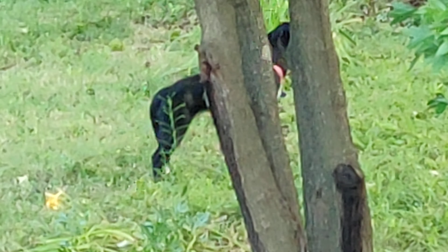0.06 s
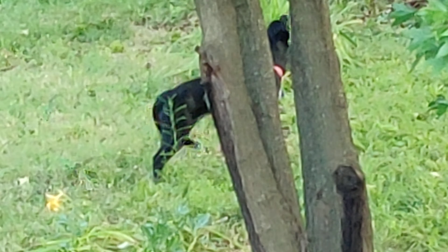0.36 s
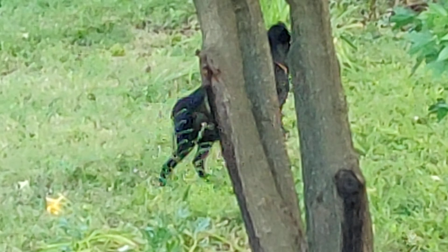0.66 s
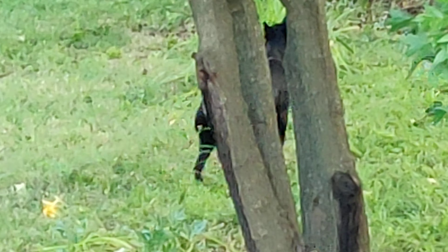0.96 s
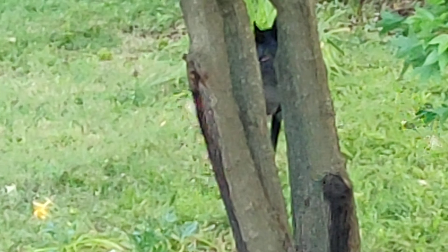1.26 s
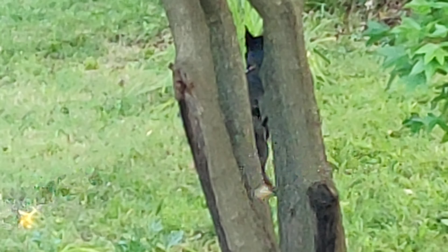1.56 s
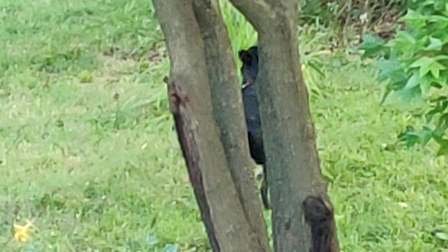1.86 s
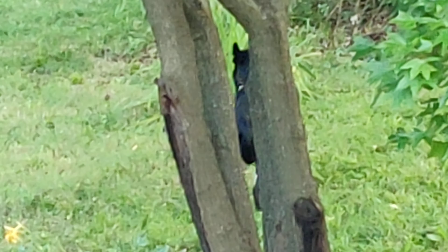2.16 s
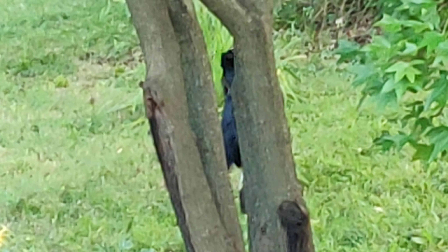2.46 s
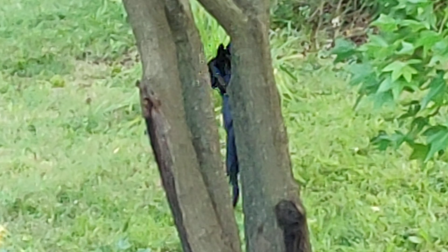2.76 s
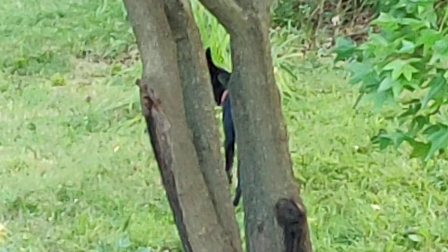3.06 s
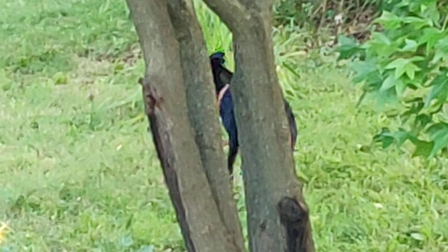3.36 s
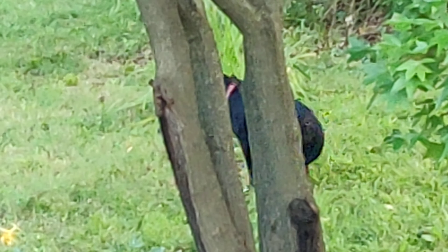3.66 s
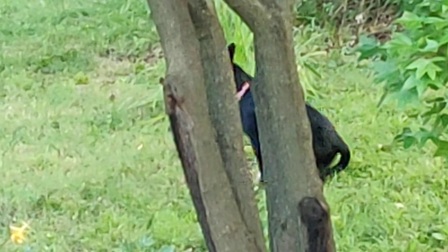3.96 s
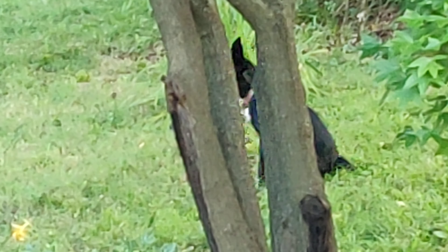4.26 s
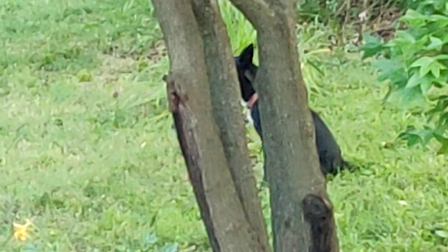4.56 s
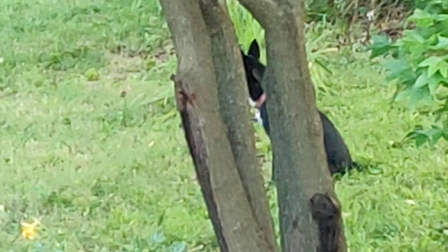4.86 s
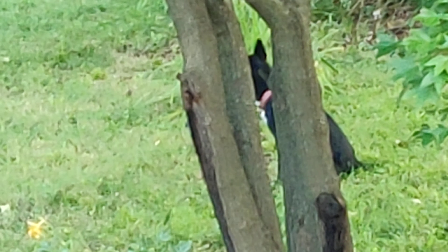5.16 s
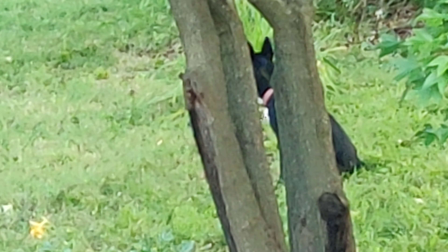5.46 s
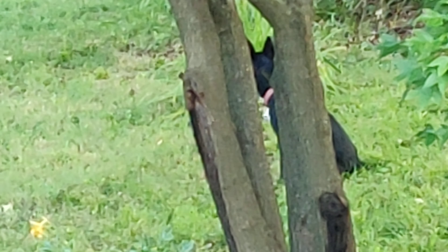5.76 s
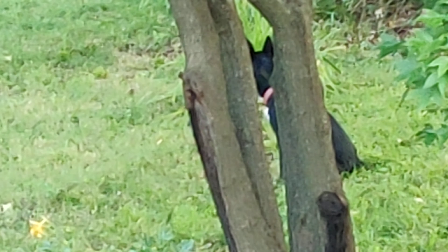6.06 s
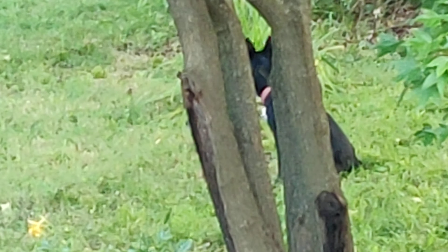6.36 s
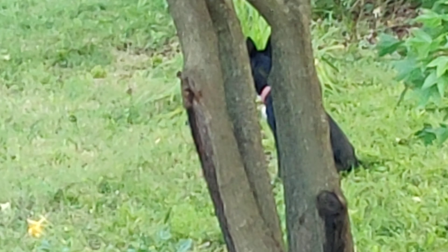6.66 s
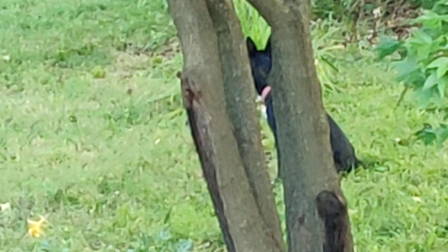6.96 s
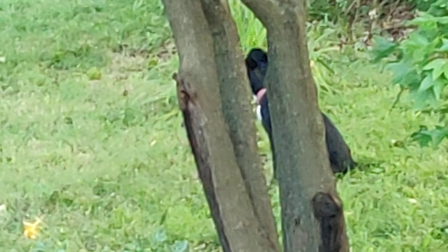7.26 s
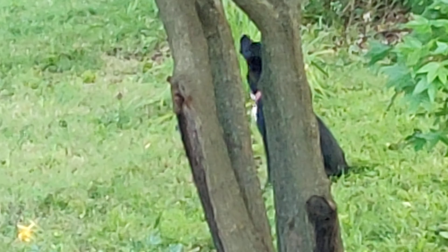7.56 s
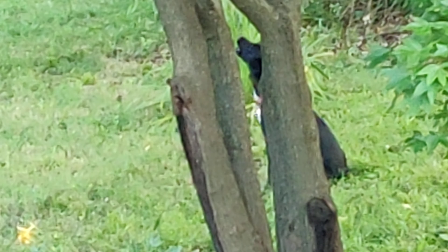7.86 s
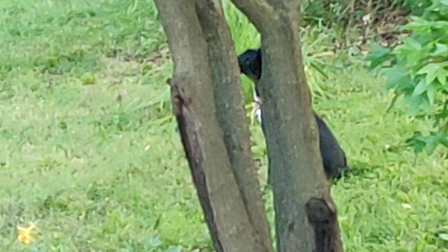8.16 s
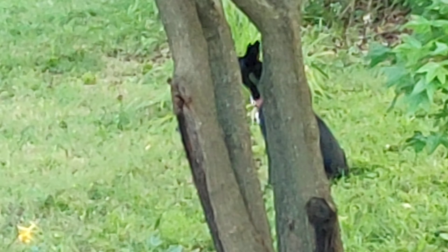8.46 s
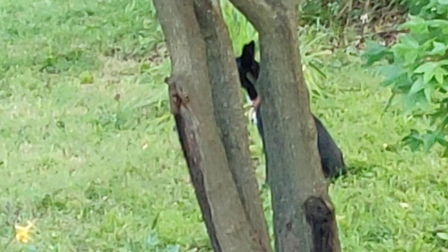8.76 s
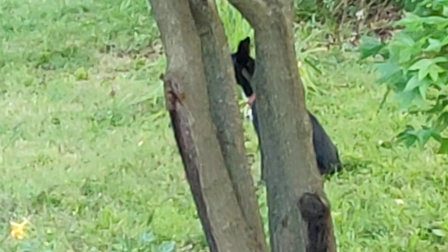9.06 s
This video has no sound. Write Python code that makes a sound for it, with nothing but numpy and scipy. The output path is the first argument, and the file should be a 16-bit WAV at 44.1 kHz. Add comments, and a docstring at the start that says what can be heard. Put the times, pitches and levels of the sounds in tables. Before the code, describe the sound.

A dog barks and howls in a yard, trailing into whimpers, while insects buzz steadily and a distant truck drones.

```python
"""A dog in a summer yard barks, strains up into a pure howl and ends in whimpers; fences and trees
send its voice back. All along, crickets trill in the grass and a far truck drones in the open air.
A katydid scrapes its wings, first in ticks, then in a buzz. The dog barks four times, rough pulses
from its throat shaped by its jaw, and gives a muffled woof. The truck shifts gear and labours on, a
low rumble swells, and a last bark breaks into a second howl and a whimper."""
import sys
import numpy as np
from scipy import signal
from scipy.fft import rfft, irfft, next_fast_len
from scipy.io import wavfile
from scipy.ndimage import uniform_filter1d

SR = 44100
rng = np.random.default_rng(int(sys.argv[2]) if len(sys.argv) > 2 else 0)


def pcm_store(signal):
    """Save signal as 16-bit PCM."""
    levels = np.round(np.clip(np.atleast_2d(signal), -1, 1) * 32767)
    wavfile.write(sys.argv[1], SR, levels.astype(np.int16).T)


N = 401751
TIME = np.arange(N) / SR


def from_db(db):
    """Turn decibels into a gain to multiply by."""
    return np.exp(np.asarray(db) * (np.log(10) / 20))


def rms_one(x):
    """Scale a signal so that its average (rms) level is 1."""
    return x / np.sqrt(np.mean(x ** 2) + 1e-20)


def evened(x, size=900):
    """Hold the level at 1, averaged over `size` samples."""
    return x / np.sqrt(np.abs(uniform_filter1d(x * x, size)) + 1e-12)


def in_time(rows):
    """Glide from row to row: each column's value at every sample."""
    times, *columns = np.transpose(rows)
    return [np.interp(TIME, times, column) for column in columns]


def latest(rows):
    """At every sample: the time since the latest event began, then that event's other columns."""
    starts, *columns = np.transpose(rows)
    which = np.maximum(np.searchsorted(starts, TIME, "right") - 1, 0)
    return [np.maximum(TIME - starts[which], 0)] + [column[which] for column in columns]


def envelope(t, length, attack_s, release_s):
    """Fade in, hold, fade out."""
    return np.clip(np.minimum(t / attack_s, (length - t) / release_s), 0, 1)


def bell(t, width):
    """A bump of height 1 around t = 0."""
    return np.exp(-.5 * np.minimum((t / width) ** 2, 100))


def swells(rows, rise_s, fall_s):
    """A bell-shaped swell for each row of peak time and level in dB."""
    out = np.zeros(N)
    for peak_s, db in rows:
        near = slice(max(int((peak_s - 4 * rise_s) * SR), 0), int((peak_s + 4 * fall_s) * SR))
        t = TIME[near] - peak_s
        out[near] += from_db(db) * np.exp(-.5 * (t / np.where(t < 0, rise_s, fall_s)) ** 2)
    return out


def drift(rate):
    """A smooth random wander of about 1, with `rate` new values a second."""
    knots = rng.standard_normal(int(N / SR * rate) + 4)
    smooth = signal.resample_poly(knots, 8, 1)
    return rms_one(np.interp(TIME * rate * 8, np.arange(len(smooth)), smooth))


def phase_of(hz):
    """The running angle, in radians, of a tone with this pitch."""
    return 2 * np.pi * np.cumsum(hz) / SR


def colour(x, gain_at):
    """Filter by a gain that depends on frequency."""
    size = next_fast_len(N + 8192)
    hz = np.arange(size // 2 + 1) * SR / size + 1e-3
    return irfft(rfft(x, size) * gain_at(hz), size)[..., :N]


def at_hz(points, hz):
    """Read between the points of a curve, on a log-frequency axis."""
    point_hz, values = np.transpose(points)
    return np.interp(np.log(hz), np.log(point_hz), values)


def shaped(x, spectrum):
    """Filter by rows of frequency in Hz and gain in dB."""
    return colour(x, lambda hz: from_db(at_hz(spectrum, hz)))


def moving_resonance(x, centre_hz, width_hz, size=160):
    """A ringing filter whose centre moves every `size` samples."""
    radius, state, out = np.exp(-np.pi * width_hz / SR), np.zeros(2), np.zeros(N)
    feed = np.array([1, 0, -1]) * (1 - radius ** 2) / 2
    for i in range(0, N, size):
        feedback = [1, -2 * radius * np.cos(2 * np.pi * centre_hz[i] / SR), radius ** 2]
        out[i:i + size], state = signal.lfilter(feed, feedback, x[i:i + size], zi=state)
    return out


def later(x, delay_s):
    """The same sound a little later."""
    return np.interp(TIME - delay_s, TIME, x, left=0)


def pan(db):
    """Two gains that make the left side `db` louder than the right."""
    return from_db(np.array([[db], [-db]]) / 2)


def stereo_noise(likeness):
    """White noise whose two sides are alike, by rows of frequency in Hz and likeness from 0 to 1."""
    mid, side = rng.standard_normal((2, N))
    common = colour(mid, lambda hz: np.sqrt(1 + at_hz(likeness, hz)))
    apart = colour(side, lambda hz: np.sqrt(1 - at_hz(likeness, hz)))
    return np.array([common + apart, common - apart])


def vocal_folds(pitch_hz, rough, jitter=.07, doubling=.47, unsteady=.02):
    """Pulses from the throat, whose timing and strength turn chaotic as the voice gets rough."""
    rough = np.clip(rough, 0, 1)
    phase = phase_of(pitch_hz * (1 + rough * (jitter * drift(350) + unsteady * drift(70))))
    pulses = sum(np.cos(k * phase) / (1 + (k / 6) ** 2) for k in range(1, 10))
    # every other pulse weakens, which adds tones between the harmonics
    pulses *= 1 + rough * (doubling * np.cos(phase / 2) + 1.1 * drift(260))
    # air rushes out at each opening and takes over only in the harshest moments
    air = rng.standard_normal(N) * (1 + .6 * np.cos(phase))
    return (1 - .55 * rough) * pulses + 3.8 * rough ** 1.25 * air


# The barks. A "moment" runs from 0 at a bark's start to 1 at its end. Each row: start in seconds,
# length in seconds, level in dB, first pitch in Hz, top pitch in Hz, moment of the top pitch,
# roughness from 0 to 1, harshest moment, the mouth's resonance in Hz when open and when closed,
# rasp in dB, raspiest moment.
BARKS = [(0.0, 0.2, -19, 445.1, 489.5, .42, 0.33, 0.665, 878, 660, -21.5, 0.29),
         (1.84, 0.17, -19, 396, 461.9, 0.66, .38, .36, 735, 620, -26, 0.74),
         (2.563, 0.18, -19.5, 424.2, 485.6, .5, .5, .72, 842, 530, -23.5, 0.67),
         (3.293, .196, -16.5, 365, 490.5, .74, .6, .44, 846, 610, -18.5, .14),
         (3.828, 0.17, -19.5, 435, 470, .42, .58, .13, 740, 490, -21, 0.21),
         (7.236, 0.18, -19, 465, 533, .75, 0.5, .45, 915, 650, -24, .55)]


def bark_gesture(loudest_at=.42, arch_db=7.5, widest_at=.3, sag_hz_per_s=550, rasp_fade_db_per_s=95):
    """In each bark the level arches, the pitch climbs and sags, and the jaw opens and shuts."""
    (t, length, db, first_hz, top_hz, top_at, rough, harsh_at,
     open_hz, closed_hz, rasp_db, rasp_at) = latest(BARKS)
    t = np.minimum(t, length)
    moment, past_top_s = t / length, t - top_at * length
    gain = envelope(t, length, attack_s=.02, release_s=.038)
    gain *= from_db(db - arch_db * (2 * (moment - loudest_at)) ** 2)
    climb_hz = (top_hz - first_hz) * np.minimum(moment / top_at, 1) ** 2
    pitch_hz = first_hz + climb_hz - sag_hz_per_s * np.maximum(past_top_s, 0)
    # the voice clears at its top pitch, and has one brief spell of chaos
    rough = rough * (1 - .39 * bell(past_top_s, .016)) + .5 * bell(t - harsh_at * length, .017)
    mouth_hz = open_hz + (closed_hz - open_hz) * ((moment - widest_at) / (1 - widest_at)) ** 2
    return gain, pitch_hz, rough, mouth_hz, rasp_db - rasp_fade_db_per_s * abs(t - rasp_at * length)


# How the throat colours the voice. Each row: frequency in Hz, gain in dB.
THROAT = [(200, -39.5), (310, -8.5), (400, 1), (500, 1.5), (600, 0.5), (800, 0.5), (950, -2), (1100, -5),
          (1330, -2), (1580, -13.5), (2500, -32.5), (3100, -34), (3550, -32), (9000, -48)]


def barks(leak=.13, second_db=-4.5, bite_hz=2500):
    """The mouth's resonance moves with the jaw, and effort brings out a rasp in the upper throat."""
    gain, pitch_hz, rough, mouth_hz, rasp_db = strained(bark_gesture())
    voice = shaped(vocal_folds(pitch_hz, rough), THROAT)
    body = colour(voice, lambda hz: 1 / (1 + (hz / 1550) ** 12))
    mouth = moving_resonance(body, mouth_hz, width_hz=506) + leak * body
    # the next resonance rides above the first and grows as the jaw opens
    second = moving_resonance(body, 1.552 * mouth_hz, width_hz=290)
    mouth -= from_db(second_db) * (mouth_hz / 800) ** 2 * second
    rasp = from_db(rasp_db - .5) * evened(voice - body)
    # a narrow throat resonance grows twice as fast as the rasp
    bite = from_db(11 + 2 * rasp_db) * evened(colour(voice, lambda hz: bell(hz - bite_hz, 230)))
    return gain * (evened(mouth, size=400) + rasp + bite)


# Echoes from fences and trees. Each row: delay in seconds, level in dB, left over right in dB.
ECHOES = [(.031, -12, 6.5), (.083, -29.5, -2), (.145, -26.5, 3)]


def yard(sound, sideways, scatter_s=.069, scatter_db=-9, tail_s=1.0, tail_db=-11):
    """Trunks dull the direct sound; what spreads sideways returns as scatter, echoes and a thin tail."""
    t = TIME[:SR]
    scatter = rng.standard_normal((2, SR)) * from_db(-60 * t / scatter_s)
    tail = rng.standard_normal((2, SR)) * from_db(-60 * t / tail_s) * np.clip(t / .048, 0, 1)
    response = (from_db(scatter_db) * rms_one(scatter) + from_db(tail_db) * rms_one(tail)) / np.sqrt(SR)
    # the ground makes some pitches come back stronger than others
    ground = [(300, -8), (460, 3.5), (700, -4), (950, -4), (1400, 6.5), (2500, 7), (3500, 15.5),
              (8000, 2)]
    reverb = shaped(signal.fftconvolve(sideways[None], response, axes=1)[:, :N], ground)
    echoes = sum(from_db(db) * pan(side_db) * later(sideways, delay) for delay, db, side_db in ECHOES)
    direct = pan(1.8) * shaped(sound, [(2400, 0), (3300, -7), (9000, -7)])
    return direct + reverb + echoes


# The colour of the far insect chorus. Each row: frequency in Hz, gain in dB.
CHORUS = [(4000, -35), (4750, -22.5), (5100, -2), (5800, -2), (6400, -2), (6950, 1), (7400, -17),
          (8200, -18.5), (11000, -17.5), (13000, -12.5), (15300, 0), (16000, -8.5)]


def insect_chorus(level_db=-47, swell_db=2, swell_at_s=5.9):
    """Many far insects blend into a high hiss that swells once."""
    gain = from_db(level_db + swell_db * bell(TIME - swell_at_s, .5))
    return pan(-.5) * gain * rms_one(shaped(rng.standard_normal((2, N)), CHORUS))


def wing_tone(hz, width_hz):
    """The ring of an insect's wing, blurred on its way through the grass."""
    noise = rng.standard_normal((2, N))
    return rms_one(colour(noise, lambda f: 1 / (1 + (2 * (f - hz) / width_hz) ** 4)))


# The near crickets. Each row: pitch in Hz, width of the tone in Hz, pulses per second, level in dB,
# left over right in dB.
CRICKETS = [(5760, 520, 70, -55, -2.5), (5576, 650, 150, -61.5, -6), (6300, 600, 120, -62, -10),
            (6810, 400, 35, -66, -19.5)]


def crickets():
    """Each cricket's wings ring in fast pulses, making a steady trill."""
    out = np.zeros((2, N))
    for hz, width_hz, pulses_hz, db, side_db in CRICKETS:
        trill = rms_one(1 + .94 * np.sin(phase_of(pulses_hz * (1 + .013 * drift(3.3)))))
        out += from_db(db) * pan(side_db) * trill * wing_tone(hz, width_hz)
    return out


# A far truck pulls up through a gear, then shifts and labours on; a fainter, higher hum goes with it.
# Each row: time in seconds, pitch in Hz (for the engine, its firing rate), relative level in dB.
ENGINE_PULLS = [(0.2, 124.4, -53), (1.79, 138.3, -48.5), (5.24, 164.9, -52), (5.75, 155, -57.5)]
ENGINE_LABOURS = [(5.9, 123.8, -53), (6.04, 125.8, -39), (6.65, 126.4, -38.5), (6.69, 127.2, -48),
                  (7.0, 116.4, -41), (7.25, 116.3, -32), (7.57, 116.7, -49), (7.9, 123.6, -36.5),
                  (8.59, 122.3, -35), (8.87, 112.5, -36.5), (9.11, 112.7, -31.5)]
HUM = [(0.3, 220.4, -61.5), (0.54, 236.2, -57.5), (4.2, 218, -50.5), (5.18, 223.7, -52.5),
       (8.9, 221.1, -49.5)]


def truck(hum_db=-1.5):
    """The engine's firing and the hum: two low tones that waver in pitch and level."""
    out = np.zeros(N)
    for curve, gain_db in ((ENGINE_PULLS + ENGINE_LABOURS, 0), (HUM, hum_db)):
        hz, level_db = in_time(curve)
        gain = np.sqrt(2) * from_db(level_db + gain_db + 2 * drift(12))
        out += gain * np.sin(phase_of(hz * (1 + .014 * drift(16))))
    return out


# The colour of the open air. Each row: frequency in Hz, gain in dB.
AIR = [(20, -2), (70, 0), (120, -6), (190, -8.5), (280, -11.5), (480, -10), (850, -12.5), (1050, -15.5),
       (1800, -21), (3000, -31.5), (4600, -38.5), (9000, -70.5)]
# How alike the air sounds on the left and right. Each row: frequency in Hz, likeness from 0 to 1.
AIR_LIKENESS = [(30, 0.5), (100, 1), (250, 1), (600, 0.4), (1500, 0.45), (4000, 0)]


def open_air(level_db=-39.5):
    """A soft, low wash of noise whose level wanders a little."""
    return from_db(level_db + drift(4)) * rms_one(shaped(stereo_noise(AIR_LIKENESS), AIR))


def rumble(level_db=-44.5, swell_db=10, swell_at_s=6.95):
    """A deep noise that swells once."""
    spectrum = [(10, -13), (30, -1), (75, -8.5), (110, -12.5), (300, -39), (2000, -91.5)]
    gain = from_db(level_db + swell_db * bell(TIME - swell_at_s, .53))
    return gain * rms_one(shaped(stereo_noise(AIR_LIKENESS), spectrum))


# The katydid's first stray ticks. Each row: time in seconds, relative level in dB.
STRAY_TICKS = [(0.0494, -41), (0.1894, -44.5)]


def katydid_ticks(count=10, first_s=.841, gap_s=.0957, quickens_s=.00096):
    """The loudness of the ticks: stray ones, then a run that quickens and firms up."""
    k = np.arange(count)
    times = first_s + gap_s * k - quickens_s * k ** 2 / 2
    run = list(zip(times, -36.5 - 7 * bell(k, .91)))
    return from_db(-3.5) * swells(STRAY_TICKS + run, rise_s=.008, fall_s=.004)


# The katydid's buzz, which begins at the first row. Each row: time in seconds, wing strokes per second.
STROKES = [(1.702, 20.7), (5.2, 20.93), (6.7, 20.5), (8.3, 20.53), (9.11, 20.15)]
# The colour of its wings. Each row: frequency in Hz, gain in dB.
WINGS = [(8000, -40), (11300, -22.5), (12400, -26), (13000, -8), (14500, -5.5), (15400, -4.5),
         (16000, -6.5)]


def katydid(buzz_db=-44, softer_db=5, warm_up_s=1.2, stroke_db=5.5):
    """A row of teeth scraped across the wing: single ticks, then strokes that swell and stop short."""
    t = np.maximum(TIME - STROKES[0][0], 0)
    buzz = (t > 0) * from_db(buzz_db - softer_db * np.exp(-t / warm_up_s))
    phase = phase_of((t > 0) * in_time(STROKES)[0])
    sawtooth = np.sin(phase) - .4 * np.sin(2 * phase) + .2 * np.sin(3 * phase)
    strokes = rms_one(from_db(stroke_db * sawtooth))
    scrape = rms_one(shaped(stereo_noise([(8000, .41), (16000, .37)]), WINGS))
    left, right = scrape * from_db(1.2 * drift(500))
    teeth = np.array([left, np.roll(right, 11)])   # the right side hears it 11 samples later
    return pan(9) * teeth * (katydid_ticks() + buzz * strokes)


# The dog's voice strains upward between a bark and its howl. Each row: start in seconds,
# length in seconds, level in dB, pitch in Hz, roughness from 0 to 1.
STRAINS = [(.15, .135, -29, 552, .5), (7.37, 0.1, -27, 536.6, .65)]
STRAIN_FADE_S = .025


def strained(gesture, mouth_hz=830, rasp_db=-29.5):
    """Before a howl, every control of the bark glides over to a thin, high, held note."""
    t, length, db, pitch_hz, rough = latest(STRAINS)
    share = envelope(t, length, STRAIN_FADE_S, STRAIN_FADE_S)
    held = from_db(db), pitch_hz, rough, mouth_hz, rasp_db
    return [bark + share * (note - bark) for bark, note in zip(gesture, held)]


def early_falsetto(pitch_hz=730, weaker_db=3.5, waver=.02, flicker_db=3.5):
    """The howl's high tone flickers under the strained note before it takes hold."""
    t, length, db, _, _ = latest(STRAINS)
    gain = envelope(t, length, STRAIN_FADE_S, STRAIN_FADE_S)
    gain *= from_db(db - weaker_db + flicker_db * drift(50))
    return gain * np.sqrt(2) * np.sin(phase_of(pitch_hz * (1 + waver * drift(120))))


# The howls. Each row: start in seconds, length in seconds, level in dB, early accent in dB, pitch in Hz,
# sag in Hz per second, overshoot in Hz, settling time in seconds, overtone boost in dB,
# chest voice in dB, its fade in dB per second.
HOWLS = [(.252, .686, -15, 1.5, 721.4, 28.95, 750, 0.0067, 0, -22.5, 5.5),
         (7.408, 0.494, -15.3, 3.3, 713.2, 45.1, 95, .043, 3, -19, 85)]
# The tones in a howl. Each row: multiple of the pitch, level in dB before the boost.
HOWL_PARTIALS = [(1, 0), (2, -45.5), (3, -47), (5, -64), (6, -58)]
# The colour of the air that escapes during a howl. Each row: frequency in Hz, gain in dB.
HOWL_HISS = [(250, -41), (500, 1.5), (750, 9.5), (1000, 1), (1500, -19), (2100, -28), (3050, -45),
             (3380, -11), (3700, -41), (4200, -31), (6000, -51)]


def howls(flutter=.0035, shimmer_db=.7, hiss_db=-25.5, chest_hz=479, chest_sag_hz_per_s=23):
    """A nearly pure falsetto settles from above, sags and droops; a faint chest voice fades beside it."""
    (t, length, level_db, accent_db, hz, sag, overshoot_hz, settle_s,
     boost_db, chest_db, chest_fade) = latest(HOWLS)
    t = np.minimum(t, length)
    droop_hz = 56.1 * np.exp((t - length) / .015)   # the pitch gives way at the end
    pitch_hz = hz + overshoot_hz * np.exp(-t / settle_s) - sag * t - droop_hz
    phase = phase_of(pitch_hz * (1 + flutter * drift(90)))
    tone = sum(from_db(db + boost_db * (k > 1)) * np.sin(k * phase) for k, db in HOWL_PARTIALS)
    chest_phase = phase_of((chest_hz - chest_sag_hz_per_s * t) * (1 + .008 * drift(170)))
    chest = np.sin(2 * chest_phase) + .31 * np.sin(chest_phase)
    chest *= from_db(chest_db - chest_fade * t + 2 * drift(16))
    hiss = from_db(hiss_db) * rms_one(shaped(rng.standard_normal(N), HOWL_HISS))
    gain = envelope(t, length, attack_s=.02, release_s=.032)
    gain *= from_db(level_db + accent_db * bell(t - .043, .018) + shimmer_db * drift(60))
    return gain * (np.sqrt(2) * (tone + chest) + hiss)


# A lone insect's bouts of chirping. Each row: first chirp, last chirp and gap in seconds, level in dB.
CHIRP_BOUTS = [(.87, 3.93, .51, -64), (5.37, 8.89, .44, -62.5)]


def lone_chirper(chirp_s=.072, pulses_hz=70):
    """One insect's wings ring in evenly spaced, fluttering chirps."""
    chirps = [(s, db) for first, last, gap, db in CHIRP_BOUTS
              for s in np.arange(first, last + gap / 2, gap)]
    flutter = 1 + .61 * np.sin(2 * np.pi * pulses_hz * TIME)
    return swells(chirps, chirp_s, chirp_s) * wing_tone(hz=7680, width_hz=290) * flutter


# The whimpers that close the howls. Each row: start and length in seconds, level in dB, level of the
# closing yelp in dB, top pitch in Hz, then time to the top, rise and fall in seconds,
# roughness from 0 to 1.
WHIMPERS = [(.918, 0.11, -33.5, -23, 455, .002, 0.071, .056, 0.38),
            (1.068, 0.19, -31, -25.5, 459, 0.085, .056, .056, 0.16),
            (7.895, .245, -30.5, -25.5, 490.7, .131, .15, .062, 0.09)]


def whimpers(low_hz=353.6, flatness=3.2):
    """An arch of pitch that ends in a yelp, sung with the mouth nearly shut."""
    t, length, level_db, yelp_db, top_hz, top_s, rise_s, fall_s, rough = latest(WHIMPERS)
    past_top_s = np.minimum(t, length) - top_s
    arch = np.exp(-abs(past_top_s / np.where(past_top_s < 0, rise_s, fall_s)) ** flatness)
    voice = vocal_folds(low_hz + (top_hz - low_hz) * arch, rough)
    yelp = from_db(yelp_db) * bell(past_top_s - 1.26 * fall_s, .011)   # near the foot of the fall
    gain = envelope(t, length, attack_s=.01, release_s=.01) * (from_db(level_db) + yelp)
    # the muzzle's main resonance favours the second harmonic
    muzzle = [(200, -30), (350, -7.5), (420, .5), (480, -13), (600, 3), (730, 8.5), (950, -5.5),
              (1150, -22.5), (1500, -50.5), (3000, -47), (6000, -58)]
    return gain * evened(shaped(voice, muzzle))


# The muffled woof after the four barks. Each row: time of its peak in seconds, level in dB.
WOOFS = [(4.645, -44)]


def woof():
    """A stifled puff of breath."""
    spectrum = [(200, -22), (450, -4), (700, 0), (1000, -9), (1600, -34), (6000, -60)]
    breath = rms_one(shaped(rng.standard_normal(N), spectrum))
    return swells(WOOFS, rise_s=.034, fall_s=.032) * breath


def scene():
    """The dog in its yard, with the insects and the far sounds."""
    voice = barks() + whimpers() + woof()
    howl = howls() + early_falsetto()
    # the dog howls with its muzzle raised, so little of the howl strikes the fences
    dog = yard(voice + howl, sideways=voice + from_db(-8) * howl)
    insects = katydid() + insect_chorus() + crickets() + lone_chirper()
    # the far sounds reach the right side first, and are a little louder on the left
    left, right = truck() + open_air() + rumble()
    far = pan(1.8) * np.array([later(left, delay_s=.00048), right])
    return dog + insects + far


def record(dry):
    """Cut the treble steeply above 15900 Hz."""
    return signal.sosfilt(signal.ellip(12, .1, 80, 15900, fs=SR, output="sos"), dry)


dry = scene()
out = record(dry)
pcm_store(out)
```